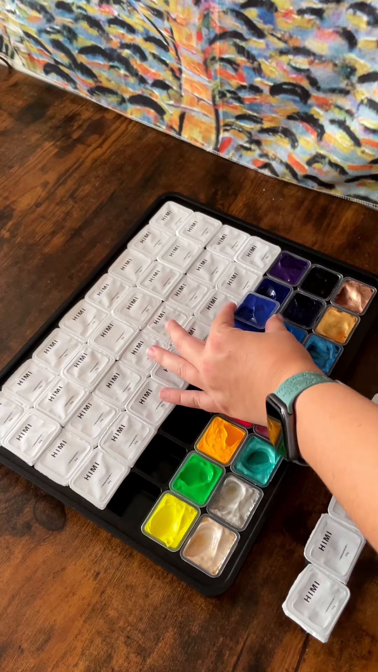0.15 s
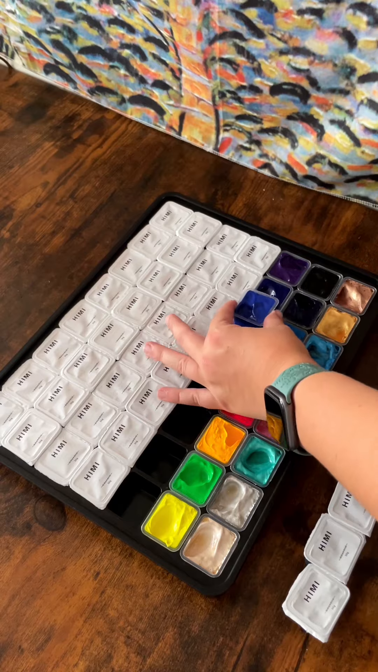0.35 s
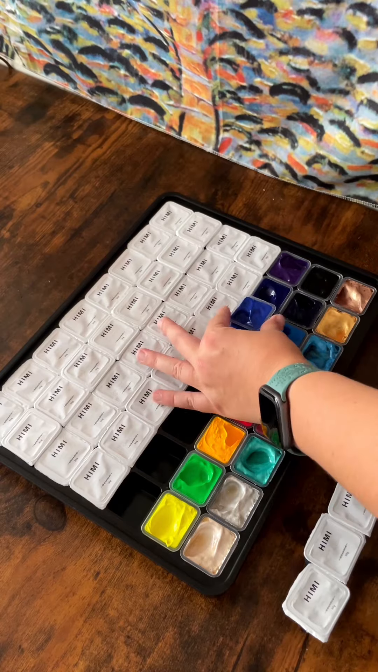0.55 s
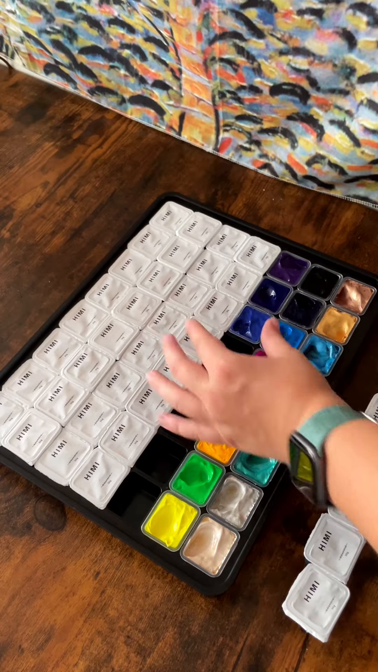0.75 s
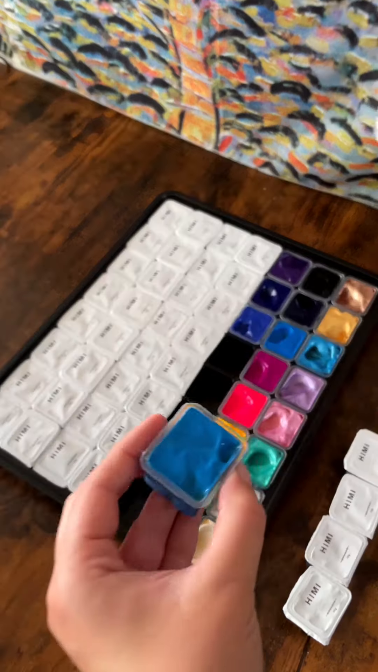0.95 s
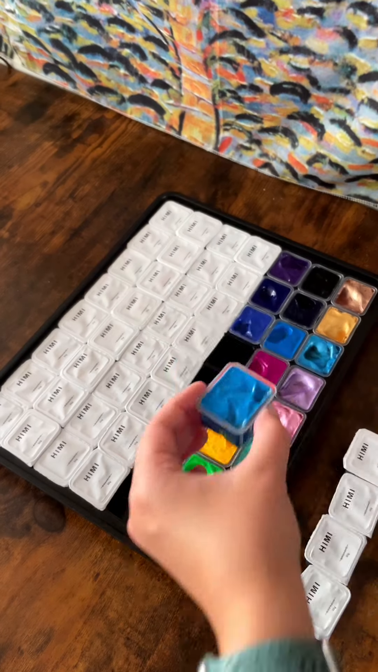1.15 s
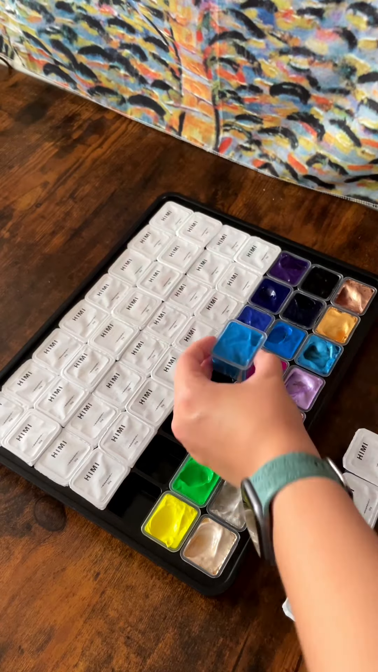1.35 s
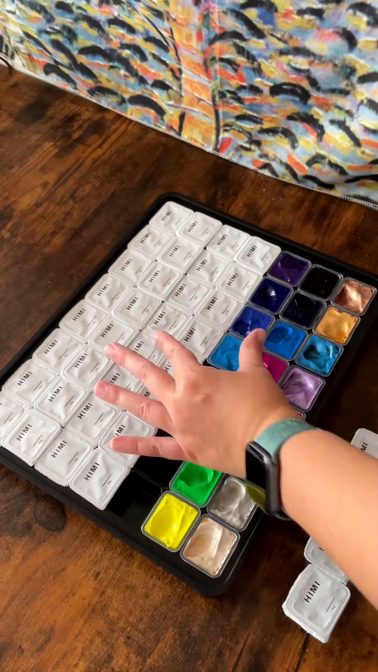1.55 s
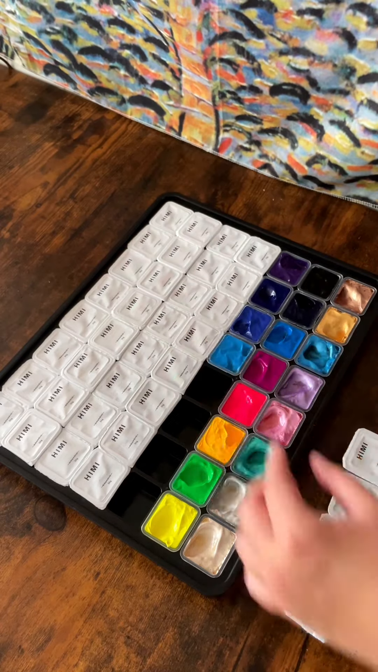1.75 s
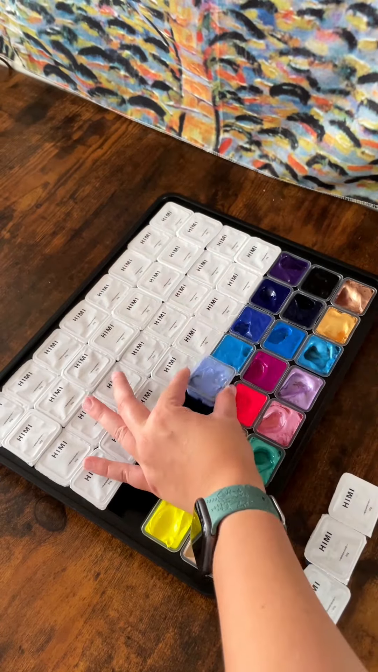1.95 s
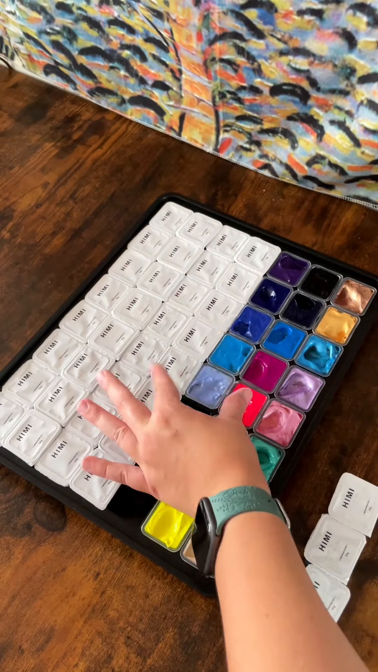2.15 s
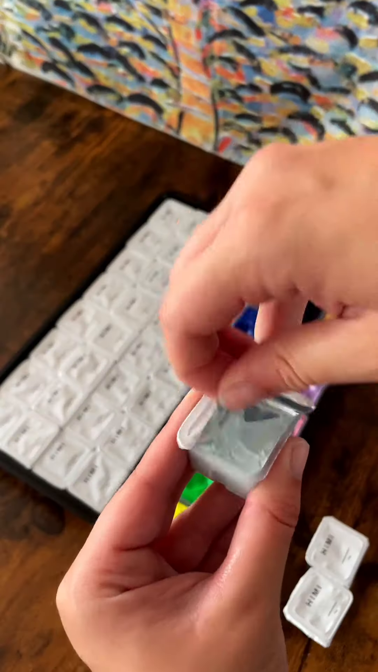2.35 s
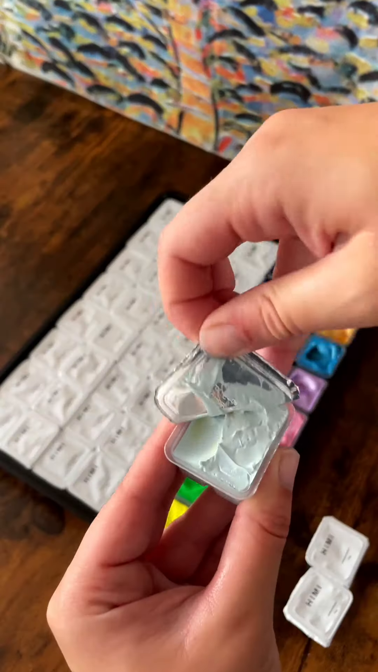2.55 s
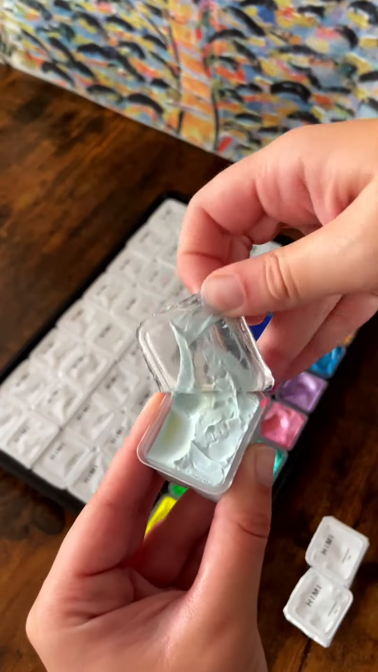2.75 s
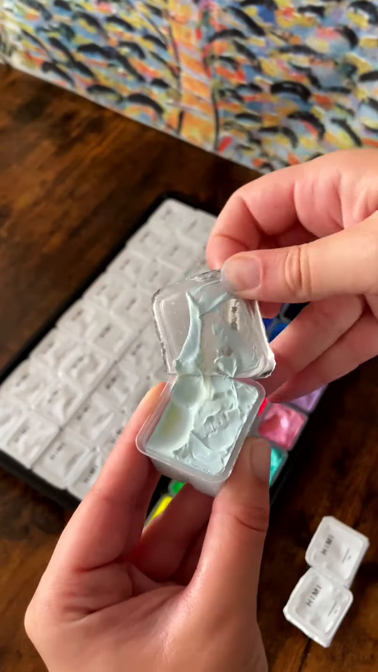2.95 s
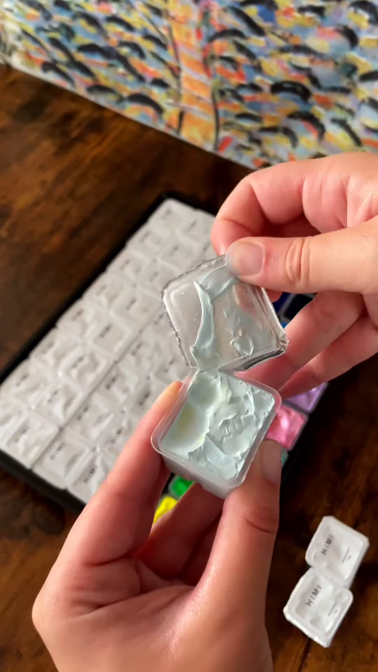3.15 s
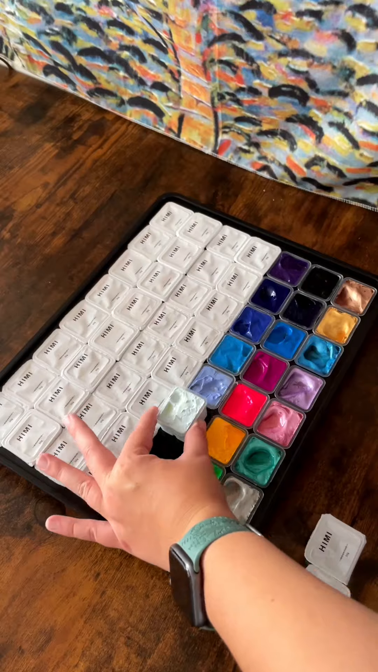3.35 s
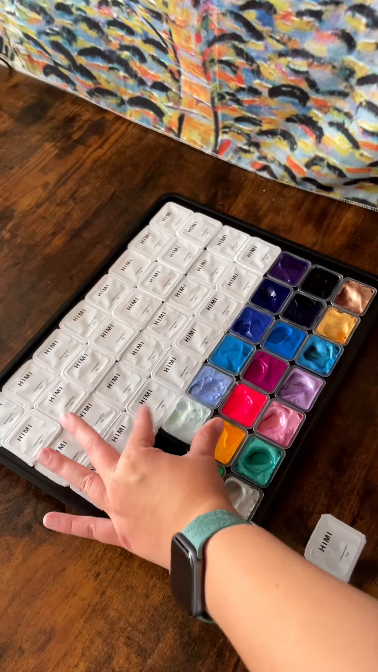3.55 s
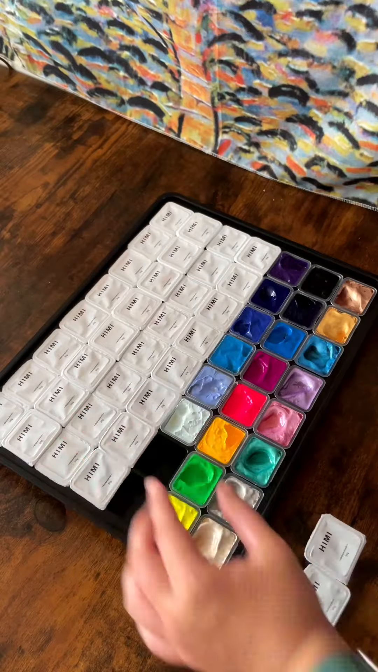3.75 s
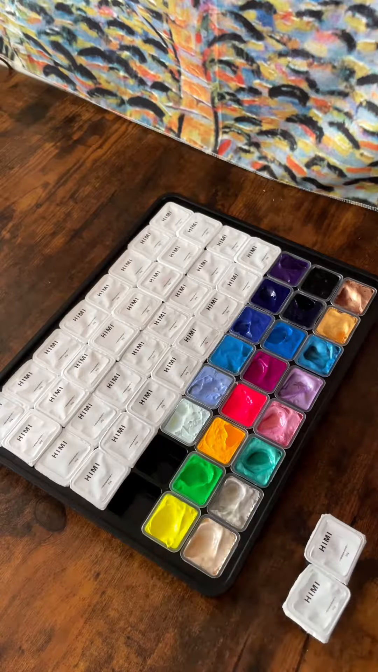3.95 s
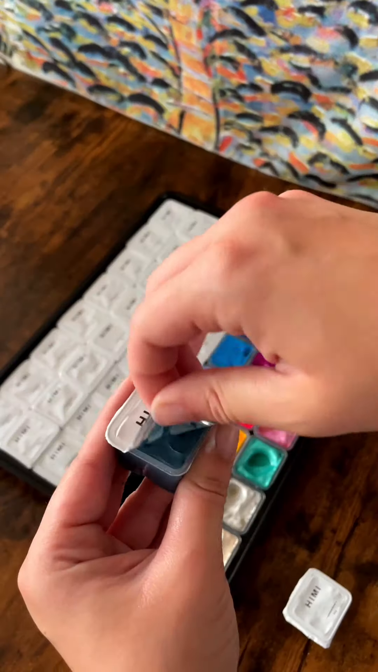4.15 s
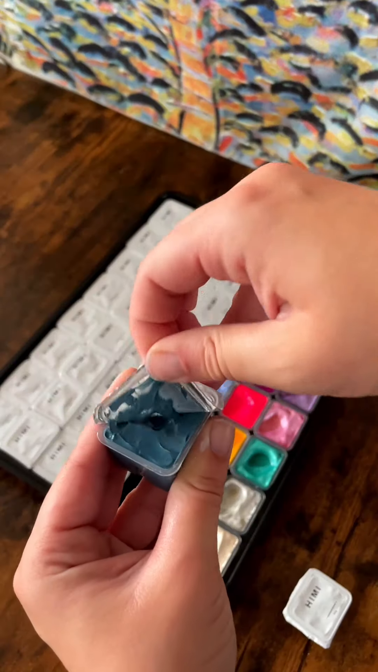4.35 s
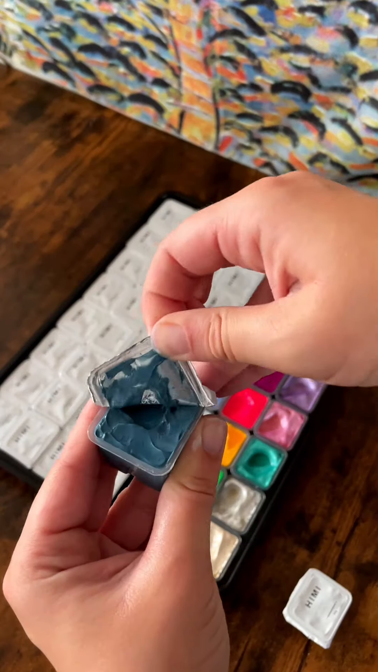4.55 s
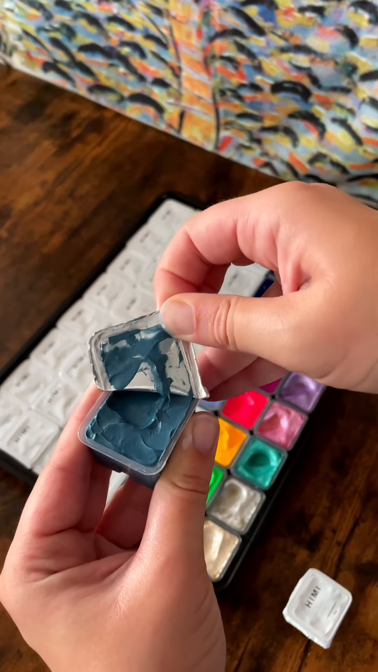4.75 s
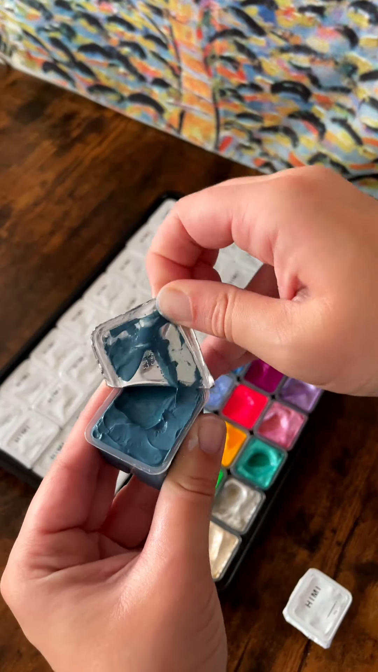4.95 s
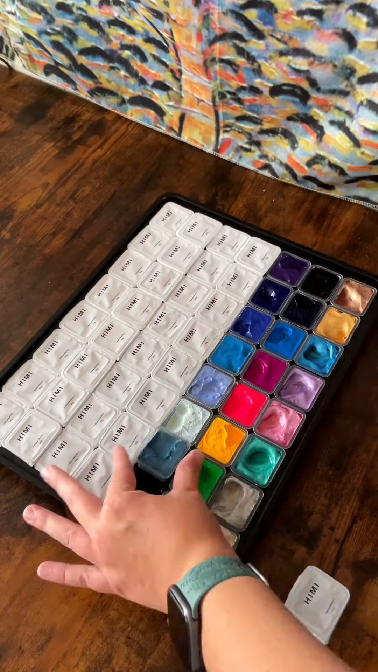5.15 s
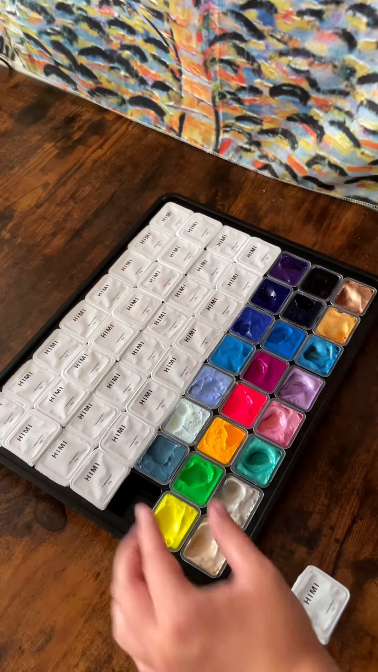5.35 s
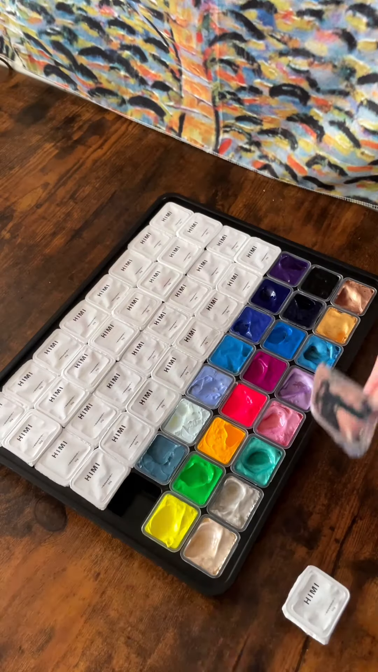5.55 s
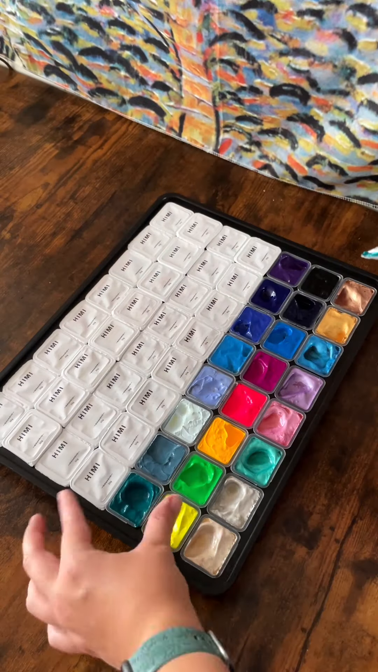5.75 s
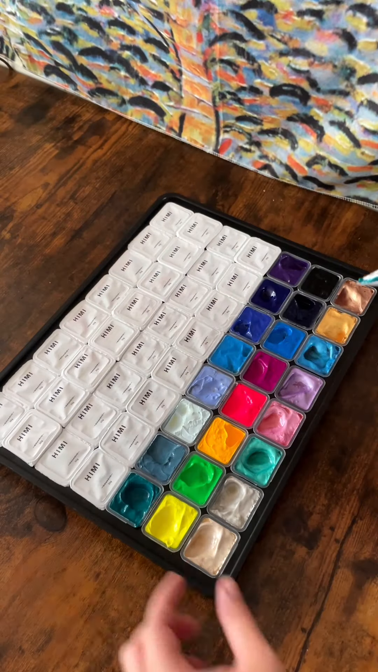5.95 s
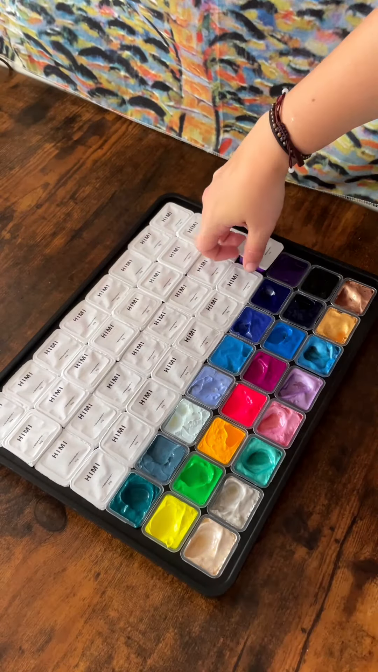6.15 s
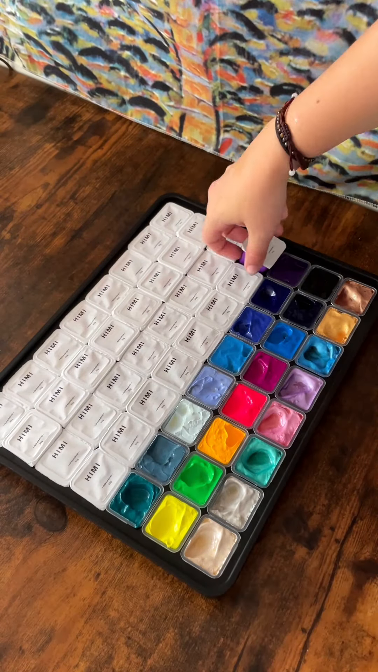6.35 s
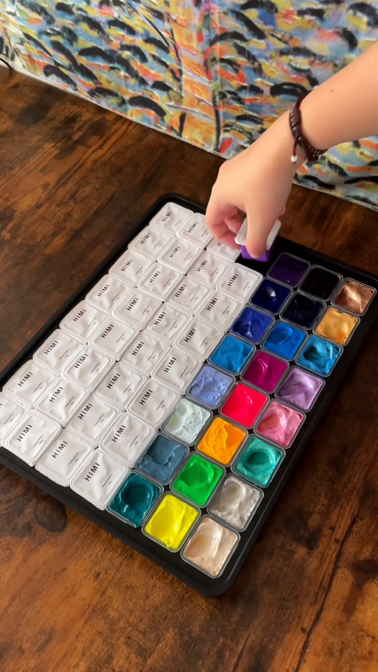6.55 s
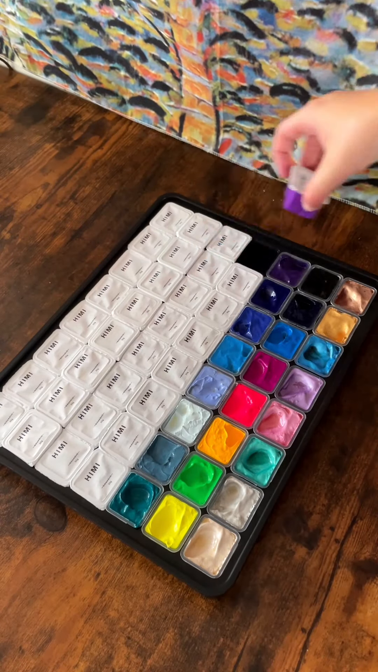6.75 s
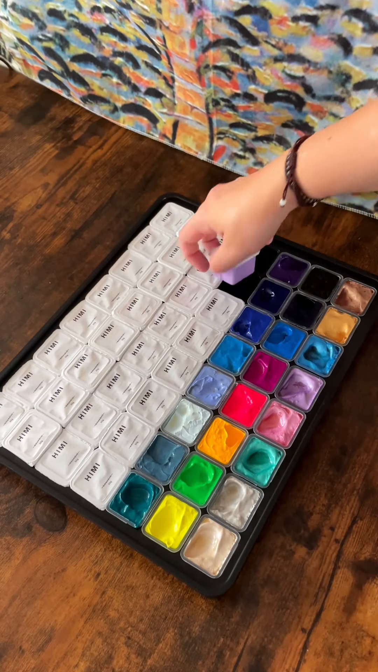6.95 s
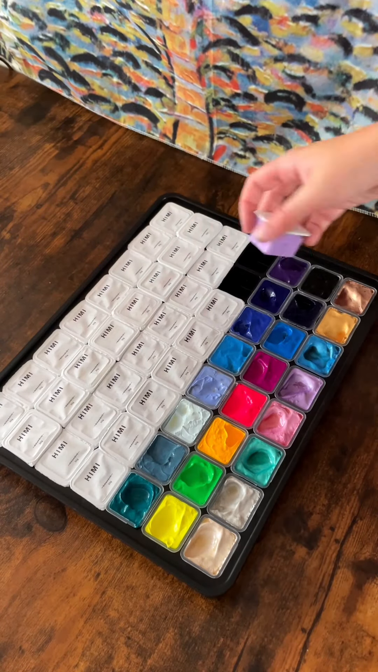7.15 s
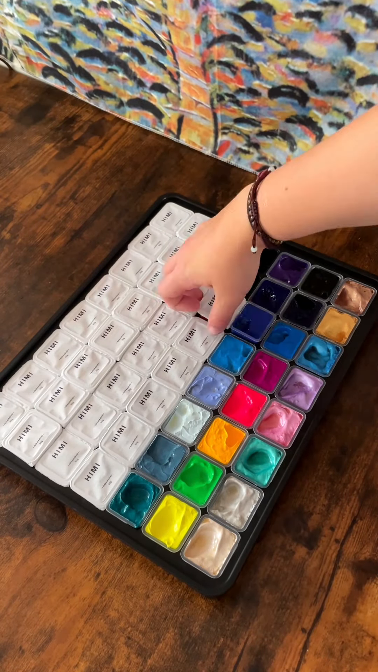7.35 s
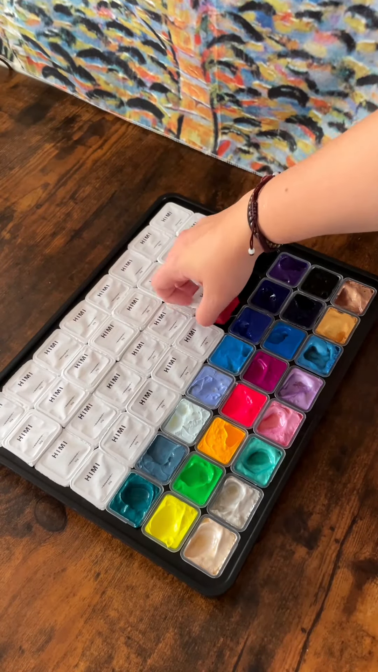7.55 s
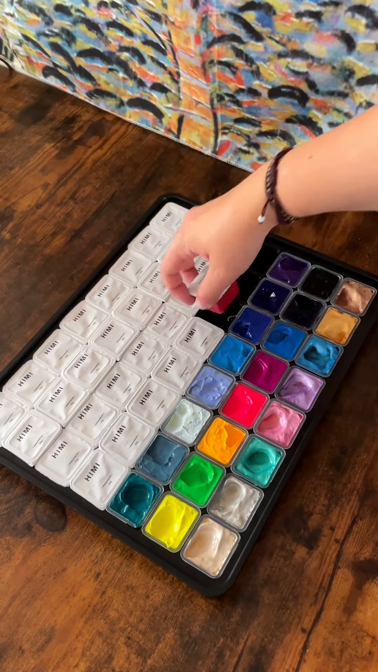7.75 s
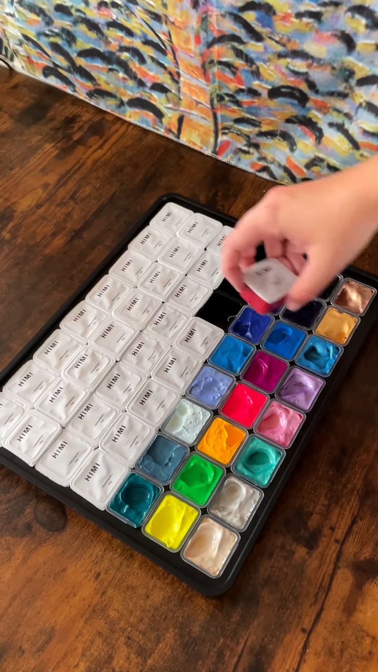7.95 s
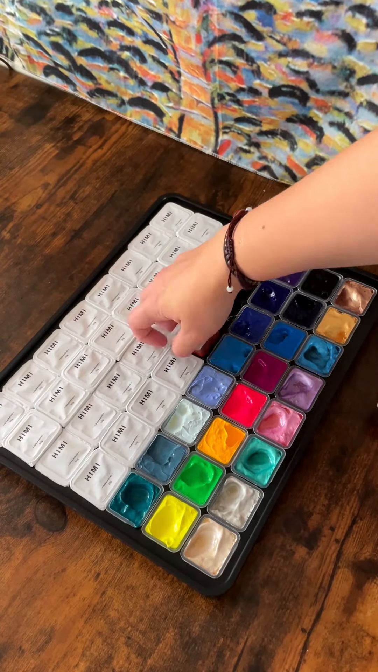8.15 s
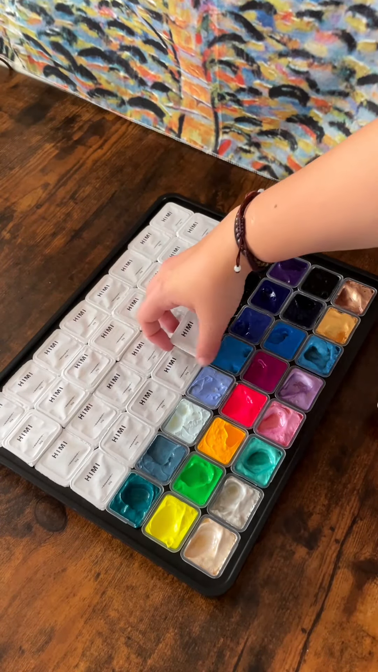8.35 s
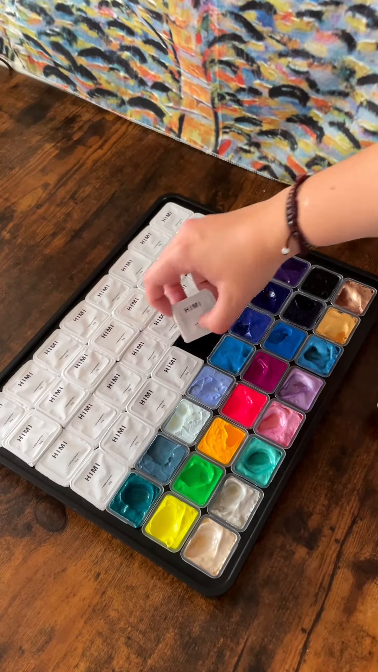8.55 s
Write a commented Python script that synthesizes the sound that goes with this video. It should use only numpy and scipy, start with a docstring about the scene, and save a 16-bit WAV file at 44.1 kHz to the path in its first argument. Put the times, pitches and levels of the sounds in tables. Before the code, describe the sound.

Close to a phone in a quiet indoor room, small plastic paint cups clack into a tray with soft wooden thumps. A sharp, bright film snap rings out around two and a half seconds, then more clacks. A slow sticky peel crackles in even tugs near the middle, followed by seating knocks, faint rubs and sparse cup clicks. Low rumble, hum and thin hiss lie underneath.

```python
"""Stiff plastic seals are peeled off small paint cups close to a phone, in a quiet room.
The film crackles in grains of parting glue and snaps in short noise bursts with a flap resonance.
Cups pushed into and lifted out of a plastic tray knock in ringing bursts and shake a wooden desk's modes.
Filtered grains make the rubs and brushes; damped sines make soft bumps through the stand.
Shaped noise gives the room's rumble and hiss, and steady sines its low hum."""
import sys
import numpy as np
from scipy import signal
from scipy.fft import rfft, irfft
from scipy.io import wavfile
from scipy.ndimage import uniform_filter1d

SR = 44100
rng = np.random.default_rng(int(sys.argv[2]) if len(sys.argv) > 2 else 0)


def unload_wav(signal):
    """Save mono or channel-first audio to the path in sys.argv[1] as 16-bit WAV at rate SR, clipped to [-1, 1]."""
    wavfile.write(
        sys.argv[1],
        SR,
        np.round(np.clip(np.atleast_2d(signal).T, -1, 1) * 32767).astype(np.int16),
    )


N = 378819

# Film snaps, and one dry, low cup knock at 3.24 s. Each row: time in seconds, strength in dB (broad
# colour at 2.3 kHz), resonance in Hz (the flap's, for a snap), body in dB, treble slope in dB per octave,
# extra room send in dB.
FILM_SNAPS = [(0.0123, -37.5, 1410, -3, 6, 0), (0.297, -17, 6040, 6, 0.5, 15),
              (2.3586, 1, 1650, -9.5, -1, 6), (2.3702, -11, 2300, -10, -4, -4),
              (2.3724, 14.5, 2700, -16.5, -3.5, -2.5), (2.6383, 2, 895, -1.5, -8.5, -1),
              (2.685, -13, 2110, -6, -0.5, -2), (2.7381, -11, 4970, 3, 0.5, -5.5),
              (2.8004, -2.5, 2100, 4.5, 2, -2.5), (2.9949, -16, 5320, 2, -1.5, -4),
              (3.0022, -4, 5100, 5.5, 0, -0.5), (3.1794, -16.5, 2020, 4, -2, 3),
              (3.221, -25.5, 1400, 3, -0.5, -0.5), (3.2364, 6.5, 2940, -4, -1, -38),
              (3.24, -0.5, 438, 5, -2, -29), (4.27, -20, 1120, 6, -3.5, 10),
              (4.311, -8.5, 1030, -0.5, -11, 1), (4.3476, -2, 3360, -2.5, -5, 3),
              (4.3697, -15.5, 2370, -5, -4.5, -7), (4.4826, -31, 5020, -13, 0, -4),
              (4.567, -30.5, 4880, 0, -1, -6), (4.5899, -10, 4760, 10.5, -0.5, 2),
              (4.7776, -34, 5270, 8, -4, 9), (4.9014, 0, 3520, -10.5, 0.1, -2),
              (4.982, -26.5, 3150, 5, 3, 7), (5.0083, -28, 3640, 6, 2.5, 9),
              (5.086, -23.5, 1450, -6, 1, 12), (5.0998, -16, 3545, -6, 1.4, -25),
              (5.1163, -21, 5360, -9, 2, -25), (5.1202, -10.5, 3460, 0.5, 4.5, -49),
              (7.5024, -28, 5210, 9.5, 7, -4)]
# A hollow and an overtone above that resonance. Each row: multiple of it, height in dB.
FLAP_PARTIALS = [(1.5, -3), (2.85, 1)]
# A cup knocks on the tray or its neighbours. Each row: time in seconds, strength in dB (broad colour
# at 1.15 kHz), cup resonance in Hz, hardness of the contact in dB.
CUP_KNOCKS = [(0.0168, -10.5, 1510, -3), (0.227, -16, 433, -18), (0.3124, -14.5, 870, 0),
              (0.4574, -11, 465, 2.5), (0.584, -10, 2300, 0), (0.6153, -5.5, 534, -0.5),
              (0.6318, -4.5, 407, 2), (1.4838, -10, 580, 3.5), (1.516, -4, 730, 2.5), (1.5303, 6, 870, -1),
              (1.9283, -23, 605, -15), (2.023, -19.5, 1180, -4), (2.0774, -16.5, 794, -1),
              (2.1685, -2, 826, 7.5), (2.1712, -4, 800, -6), (2.4031, -12, 2750, 10),
              (2.9443, -3.5, 800, -5), (3.353, -11, 573, -13), (3.4806, -18, 620, -12),
              (3.548, -6.5, 560, 0), (3.5775, -10.5, 590, -6.5), (3.5999, -4.5, 524.5, 2.5),
              (5.058, -8, 453, -13), (5.166, -8.5, 630, -2), (5.1901, -6.5, 625, 2.5), (5.2088, -7, 930, 5),
              (5.726, -1.5, 610, -3.5), (5.7452, -2, 476, -2), (6.2616, -19, 1128, -18.5),
              (6.307, -22, 1175, -5.5), (6.878, -14.5, 865, -12), (6.9213, -18.5, 905, 11),
              (6.931, -6.5, 890, 3.5), (6.9359, -3.5, 801, -6), (7.5624, 2.5, 455, -2),
              (8.285, -8, 1930, 8.5), (8.33, -15, 673, 1), (8.4205, -9, 1200, 1.5)]
# A cup is wiggled along its slot until it stops and shakes the desk. Each row: first touch in seconds,
# stop in seconds, jostle strength in dB, desk thump in dB before the desk's trim.
SEATINGS = [(0.549, .634, -20.5, -42), (1.467, 1.534, -26, -39), (2.15, 2.175, -27, -41),
            (3.348, 3.35, -25, -45), (3.53, 3.6, -18.5, -41.5), (5.182, 5.211, -15.5, -40.5),
            (5.728, 5.748, -8, -40.5), (6.855, 6.945, -25.5, -42), (7.53, 7.565, -21, -43)]
# Fingers, film and cup walls slide on each other. Each row: start in seconds, end in seconds,
# level in dB before the rubbing trim, brightness in dB.
RUBS = [(0.046, 0.101, -76.5, -0.5), (1.289, 1.476, -67.5, -10), (2.884, 2.904, -58.5, -16),
        (3.574, 3.599, -53.5, -7.5), (3.81, 3.91, -66.5, -5), (4.09, 4.105, -60.5, -7),
        (4.449, 4.459, -55.5, -1), (5.408, 5.53, -69.5, -11), (5.92, 5.994, -68.5, -4.5),
        (6.167, 6.226, -73, 2), (6.794, 6.813, -79, 15.5), (6.856, 6.933, -71, -5),
        (7.093, 7.113, -61.5, -4), (7.172, 7.189, -68, 8), (7.479, 7.573, -63, -4),
        (7.782, 7.808, -71.5, 5), (8.034, 8.089, -78, 18), (8.18, 8.265, -64.5, -3),
        (8.533, 8.579, -80, 4.5)]
# Modes of the desk under the tray. Each row: frequency in Hz, relative level in dB, t60 in seconds.
DESK_MODES = [(64, 0.5, .25), (101, 0.5, 0.15), (136.7, 1.5, .26), (185, -4.5, 0.2), (231.5, 0, 0.1),
              (348, -11, 0.23), (431, -5.5, 0.11)]
# Soft bumps reach the microphone through its stand. Each row: time in seconds, level in dB, pitch in Hz.
STAND_BUMPS = [(1.273, -33, 101.8), (1.287, -29, 84.6), (1.331, -37.5, 73.6)]
# A finger pad or cup edge brushes the tray. Each row: start in seconds, end in seconds,
# level in dB, centre of the resonance in Hz.
BRUSHES = [(3.796, 4.027, -73, 1900), (4.091, 4.099, -57.5, 3540), (4.453, 4.457, -47, 3540),
           (5.881, 6.055, -78, 2660), (6.205, 6.238, -69.5, 1150), (6.488, 6.524, -72, 1412),
           (7.38, 7.427, -77.5, 1820), (7.496, 7.517, -58.5, 5760), (7.957, 8.128, -81.5, 1776)]
# Colour of the room rumble. Each row: frequency in Hz, relative density in dB per Hz.
RUMBLE_COLOUR = [(15, -28), (28, -15.5), (40, 0.5), (60, -1), (82, -7), (120, -2.5), (180, -11.5),
                 (300, -13), (480, -14), (620, -22), (850, -23.5), (1300, -34), (3000, -54.5),
                 (16000, -94.5)]
# Colour of the hiss. Each row: frequency in Hz, relative density in dB per Hz.
HISS_COLOUR = [(200, -20), (800, 1.5), (2200, 5), (3500, -1), (5800, -2), (8000, -18.5), (11000, -6.5),
               (13000, -19.5), (16000, -39.5)]
# The hiss swells now and then; at 2.62 s it is the snap's long room tail.
# Each row: peak in seconds, half width in seconds, level in dB.
HISS_SWELLS = [(.58, 0.48, -79.5), (1.5, 0.68, -74.5), (2.62, 0.15, -66.5), (3.45, 0.26, -83),
               (4.85, 0.5, -79), (5.65, 0.38, -73.5), (8.4, 0.18, -79)]
# Lines of the electric hum. Each row: frequency in Hz, level in dB rms.
HUM_LINES = [(59.8, -62.5), (119.6, -74), (474, -73)]
# Likeness of the two ports in diffuse sound. Each row: frequency in Hz, left-right coherence.
PORT_LIKENESS = [(60, 0.97), (130, 1), (290, .6), (640, -0.1), (1400, 0.052), (3100, 0.51), (6800, -0.11),
                 (15000, 0.58)]
# Phase of near sound at the ports. Each row: frequency in Hz, lead of the left port in radians.
PORT_PHASE = [(0, 0), (350, 0), (700, 1.18), (1400, -1), (2600, 1), (3900, 1.49), (4900, 1.2), (6500, 2.11),
              (7700, 3.5), (10900, 7), (16000, 10.5)]
# Balance of near sound at the ports. Each row: frequency in Hz, left minus right in dB.
PORT_BALANCE = [(100, -1.5), (200, -3), (330, -4), (550, -8), (1150, 0), (1700, -1), (2600, -1.5),
                (4000, -1.5), (4450, -3), (5200, -0.5), (16000, 0)]
# Decay of the room's reflections. Each row: frequency in Hz, t60 in seconds.
ROOM_T60 = [(150, 0.2), (500, 0.4), (1500, 0.37), (3000, 0.46), (6000, 0.23), (11000, 0.2), (16000, .22)]
# Colour of the room's reflections. Each row: frequency in Hz, relative level in dB.
ROOM_COLOUR = [(100, 6), (1000, 2.5), (2700, -3), (6000, 2.5), (8000, -11), (10500, -2), (13000, -4.5),
               (14500, -13), (16500, -16.5)]

EDGE_HZ = 16600  # the recorder's upper band limit
TAPS = 4096  # length of a burst in samples
BINS = np.fft.rfftfreq(TAPS, 1 / SR)  # Hz
ALL_BINS = np.fft.rfftfreq(N, 1 / SR)  # Hz
TIME = np.arange(N) / SR  # s
FLAP_PEAK_DB, FILM_EDGE_DB = 8, 1.5  # weight of the flap's resonance; extra bite of the film near 5 kHz
CUP_HZ, CUP_BODY_DB, BODY_DB_PER_OCTAVE = 650, 3, -1.5  # a cup that rings lower also has more body
# hardness lifts the fizz fully, the edge by a share
CUP_EDGE_DB, CUP_FIZZ_DB, EDGE_SHARE, CUP_SEND_DB = -12.5, -22, 0.94, -7
# small contacts on the way along the slot
JOSTLE_GAP_S, JOSTLE_SPREAD_DB, JOSTLE_OCTAVES, JOSTLE_HARD_DB = 0.015, 4, .4, 2
# the slow peel advances in even tugs, the glue quieter between them
FIRST_TUG_S, PEEL_END_S, TUGS_PER_S = 4.105, 5.2, 5.92
TUG_DB, TUG_DB_PER_S, SLACK_DB = -63.5, 1, -12
# rumble and the hiss under its swells are steady, and drop once around QUIET_S: (dB before, dB after)
QUIET_S, DROP_S, RUMBLE_DB, HISS_DB = 6.08, 0.2, (-55.5, -60), (-81.5, -84)


def gain_of(db):
    """Decibels to amplitude."""
    return 10 ** (np.asarray(db) / 20)


def evened(x):
    """Scales to rms 1."""
    return x / np.sqrt(np.mean(x ** 2) + 1e-20)


def read(points, hz):
    """Joins (Hz, value) points on a log-frequency axis."""
    f, value = np.transpose(points)
    return np.interp(np.log(hz + 1), np.log(f + 1), value)


def add(mix, s, sound):
    """Mixes a sound in at time s."""
    part = mix[..., max(round(s * SR), 0):][..., :sound.shape[-1]]
    part += sound[..., :part.shape[-1]]


def shaped(x, spectrum):
    """Gives a long signal a (Hz, dB) spectrum, at rms 1."""
    gain = gain_of(read(spectrum, ALL_BINS))
    return evened(irfft(rfft(x) * gain, N))


def diffuse(pair, right_db=1.0):
    """Two unrelated signals gain the coherence of two close ports, most alike in the bass."""
    size = pair.shape[-1]
    left, other = rfft(pair)
    same = np.clip(read(PORT_LIKENESS, np.fft.rfftfreq(size, 1 / SR)), -1, 1)
    right = gain_of(right_db) * (same * left + np.sqrt(1 - same ** 2) * other)
    return irfft(np.array([left, right]), size)


def coloured(burst, colour_db):
    """Causal filter that gives a burst the broad colour asked for and keeps its fine ripple."""
    z = rfft(burst, TAPS)
    k = np.arange(len(z))
    lo = np.maximum(k - k // 4 - 10, 0)
    hi = np.minimum(k + k // 4 + 10, len(z) - 1)
    total = np.cumsum(abs(z) ** 2)
    broad_power = (total[hi] - total[lo]) / (hi - lo)
    log_gain = np.log(gain_of(colour_db)) - np.log(broad_power + 1e-12) / 2
    # minimum phase: the phase follows from the log gain, mirrored to a full circle
    causal = np.conj(signal.hilbert(np.r_[log_gain, log_gain[-2:0:-1]]))[:len(z)]
    return irfft(z * np.exp(causal), TAPS)


def bump(hz, width):
    """Bell of height 1 around a resonance; the width is a share of its frequency."""
    return 1 / (1 + ((BINS - hz) / (width * hz)) ** 2)


def dying(t60):
    """Dense noise ringing of unit energy that falls 60 dB per t60 seconds."""
    ring = rng.standard_normal(TAPS) * gain_of(-60 * np.arange(TAPS) / SR / t60)
    return ring / np.linalg.norm(ring)


def grainy_rise(size, rise_db):
    """Noise of unit energy that grows by rise_db over a few milliseconds."""
    grit = rng.standard_normal(size) * gain_of(rise_db * np.arange(size) / size)
    return grit / np.linalg.norm(grit)


def grains(per_s, spread_db):
    """Random tiny slips, a few much larger than the rest."""
    size = gain_of(spread_db * np.minimum(rng.exponential(1, N), 4))
    return size * rng.choice([-1., 1.], N) * (rng.random(N) < per_s / SR)


def stroke(start, end):
    """Speed of a slide that gathers and stops, 0-1."""
    progress = np.clip((TIME - start) / max(end - start, 1e-3), 0, 1)
    return np.sqrt(np.maximum(np.sin(np.pi * progress), 0))


def bounced(x, delay_s, echo_db):
    """The desk top throws a sound straight back, a little duller."""
    echo = gain_of(echo_db) * np.exp(-2j * np.pi * ALL_BINS * delay_s) / (1 + ALL_BINS / 9000)
    return irfft(rfft(x) * (1 + echo), N)


def ports(x):
    """Near sound leads at the left port over most bands, and the phone's body shades each port differently."""
    phase = np.interp(ALL_BINS, *np.transpose(PORT_PHASE))
    half = np.exp(.5j * phase) * gain_of(read(PORT_BALANCE, ALL_BINS) / 2)
    return irfft(rfft(x) * np.array([half, 1 / half]), N)


def room(x, early_db, early_s):
    """Dense reflections, strongest from the desk and wall nearby, each band dying at its own speed."""
    hz, t, z = signal.stft(diffuse(rng.standard_normal((2, SR))), SR, nperseg=256)
    fade_db = read(ROOM_COLOUR, hz)[:, None] - 60 * t / read(ROOM_T60, hz)[:, None]
    tail = signal.istft(z * gain_of(fade_db), SR, nperseg=256)[1]
    t = np.arange(tail.shape[1]) / SR
    onset = np.clip((t - .003) / 0.0015, 0, 1)
    early = 1 + gain_of(early_db) * np.exp(-t / early_s)
    tail = tail * onset * early
    return signal.fftconvolve(x[None], tail / np.linalg.norm(tail[0]), axes=1)[:, :N]


def patchy(x, patchy_db, bins=12, frames=30):
    """Lets the colour of a steady noise wander in patches a few hundred hertz wide."""
    z = signal.stft(x, nperseg=1024)[2]
    patches = uniform_filter1d(rng.standard_normal(z.shape[1:]), size=bins, axis=0)
    patches = uniform_filter1d(patches, size=frames, axis=1)
    return evened(signal.istft(z * gain_of(patchy_db * evened(patches)), nperseg=1024)[1][:, :N])


def background():
    """Low room rumble and faint hiss from shaped diffuse noise, with an electric hum of steady sines."""
    step = [QUIET_S - DROP_S / 2, QUIET_S + DROP_S / 2]
    rumble = shaped(diffuse(rng.standard_normal((2, N))), RUMBLE_COLOUR)
    rumble *= gain_of(np.interp(TIME, step, RUMBLE_DB))
    # the swells add to the hiss as power
    swells = sum(gain_of(db) ** 2 * np.exp(-((TIME - s) / width) ** 2) for s, width, db in HISS_SWELLS)
    hiss_level = np.sqrt(gain_of(np.interp(TIME, step, HISS_DB)) ** 2 + swells)
    hiss = shaped(diffuse(rng.standard_normal((2, N))), HISS_COLOUR)
    hiss = patchy(hiss, patchy_db=0.3) * hiss_level
    hum = np.zeros(N)
    for hz, db in HUM_LINES:
        hum += np.sqrt(2) * gain_of(db) * np.sin(2 * np.pi * (hz * TIME + rng.random()))
    return rumble + hiss + hum


def film_snaps(crack_t60=0.0026, flap_t60=.024, flap_db=-14, lead_db=-26, room_db=-18):
    """A faint grainy rise of a few milliseconds leads into the crack, then the loose flap rings briefly."""
    near, send = np.zeros((2, N))
    lead = round(.004 * SR)
    for s, db, hz, body, slope, wet in FILM_SNAPS:
        edge = FILM_EDGE_DB + slope * np.log2(5300 / 2300)
        fizz = slope * np.log2(10500 / 2300)
        colour = read([(60, body - 32), (420, body - 7), (900, body - 1), (2300, 0.00024),
                       (5300, edge), (10500, fizz), (13000, fizz - 3), (16000, fizz - 14)], BINS)
        colour += db + FLAP_PEAK_DB * (bump(hz, width=0.12) - .55)
        for multiple, part_db in FLAP_PARTIALS:
            colour += part_db * bump(hz * multiple, width=0.057)
        rise = gain_of(lead_db) * grainy_rise(lead, rise_db=14)
        crack = dying(crack_t60) + gain_of(flap_db) * dying(flap_t60)
        snap = coloured(np.r_[rise, crack], colour)
        add(near, s - lead / SR, snap)
        add(send, s - lead / SR, snap * gain_of(wet))
    direct = ports(bounced(near, delay_s=0.0021, echo_db=-10.5))
    return direct + gain_of(room_db) * room(send, early_db=4, early_s=0.011)


def jostles():
    """Light, uneven contacts of each cup on its way along the slot, as rows like those of CUP_KNOCKS."""
    rows = []
    for start, stop, db, _ in SEATINGS:
        for s in np.arange(start, stop, JOSTLE_GAP_S):
            late, loud, pitch = rng.standard_normal(3)
            touch_s = s + late * JOSTLE_GAP_S / 5
            hz = CUP_HZ * 2 ** (JOSTLE_OCTAVES * pitch)
            rows.append((touch_s, db + JOSTLE_SPREAD_DB * loud, hz, JOSTLE_HARD_DB))
    return rows


def cup_knocks(blow_t60=0.0083, shell_t60=0.032, shell_db=-7, peak_db=6, scrape_db=-13,
               room_db=-6, rattle_db=-12):
    """A cup scrapes for a moment along its slot, then strikes and sets its neighbours rattling."""
    near, send = np.zeros((2, N))
    lead = round(.006 * SR)
    for s, db, hz, hard in CUP_KNOCKS + jostles():
        body = CUP_BODY_DB + BODY_DB_PER_OCTAVE * np.log2(hz / CUP_HZ)
        edge, fizz = CUP_EDGE_DB + EDGE_SHARE * hard, CUP_FIZZ_DB + hard
        colour = read([(50, body - 16), (200, body - 5), (450, body), (1150, 0.0038), (2000, edge / 2),
                       (3000, edge), (6000, (edge + fizz) / 2 - 1), (8000, fizz - 1),
                       (12000, fizz - 2), (16000, fizz - 14)], BINS)
        colour += db + peak_db * (bump(hz, width=0.075) - .3)
        scrape = gain_of(scrape_db) * grainy_rise(lead, rise_db=15)
        blow = dying(blow_t60) + gain_of(shell_db) * dying(shell_t60)
        knock = coloured(np.r_[scrape, blow], colour)
        add(near, s - lead / SR, knock)
        add(send, s - lead / SR, knock * gain_of(CUP_SEND_DB))
        # loose cups chatter in sparse, quickly fading ticks, heard only by way of the room
        chatter = dying(t60=0.15) * (rng.random(TAPS) < 500 / SR)
        rattle_colour = read([(200, -25), (900, -5.5), (1500, 2.0), (2300, 0.0), (3300, -11.5),
                              (7000, -18.5), (16000, -39)], BINS)
        rattle = coloured(chatter, db + rattle_db + rattle_colour)
        add(send, s, rattle * gain_of(CUP_SEND_DB))
    direct = ports(bounced(near, delay_s=.0026, echo_db=-14.0))
    return direct + gain_of(room_db) * room(send, early_db=3.5, early_s=.015)


def rubbing(level_db=-2, room_db=-6):
    """Fine stick-slip grains: dull from cup walls, bright from skin on film."""
    dull = shaped(grains(per_s=2000, spread_db=6),
                  [(200, -5), (700, -2), (2000, -2.0), (3500, -4.5), (5500, 1.0), (8000, -8.5), (16000, -20)])
    bright = shaped(grains(per_s=2200, spread_db=4),
                    [(1500, -45.0), (5000, -11.5), (7500, -8.5), (10500, 1.5), (13000, -4.0), (16000, -10.5)])
    out = np.zeros(N)
    for start, end, db, brightness in RUBS:
        friction = dull + gain_of(brightness) * bright
        out += gain_of(db + level_db) * stroke(start, end) * friction
    return ports(out) + gain_of(room_db) * room(out, early_db=8.5, early_s=0.016)


def desk(rise_s=0.0077, level_db=-1):
    """The desk top swells into its low modes each time a cup is seated."""
    out, t = np.zeros(N), np.arange(SR // 2) / SR
    for _, s, _, db in SEATINGS:
        ring = np.zeros(len(t))
        for hz, mode_db, t60 in DESK_MODES:
            ring += gain_of(mode_db - 60 * t / t60) * np.sin(2 * np.pi * (hz * t + rng.random()))
        add(out, s, gain_of(db + level_db) * ring * (1 - np.exp(-t / rise_s)))
    return ports(out)


def stand_bumps(swell_s=0.0087, overtone_db=-10):
    """Soft, heavily damped pushes of a few low cycles."""
    out, t = np.zeros(N), np.arange(SR // 4) / SR
    for s, db, hz in STAND_BUMPS:
        wobble = np.sin(2 * np.pi * hz * t) + gain_of(overtone_db) * np.sin(2 * np.pi * 2.06 * hz * t)
        add(out, s, gain_of(db) * wobble * t / swell_s * np.exp(1 - t / swell_s))
    return out


def brushing(width=0.22, room_db=-5):
    """Light friction sounds one broad resonance of the plastic that is touched."""
    grit, out = grains(per_s=1600, spread_db=4.5), np.zeros(N)
    for start, end, db, hz in BRUSHES:
        band = [hz / (1 + width), hz * (1 + width)]
        wall = signal.butter(2, band, "bandpass", fs=SR, output="sos")
        out += gain_of(db) * stroke(start, end) * evened(signal.sosfilt(wall, grit))
    return ports(out) + gain_of(room_db) * room(out, early_db=25, early_s=0.016)


def tugging():
    """Strength of the pull on the seal: it tightens and slackens at an even pace."""
    t = TIME - FIRST_TUG_S
    slack = np.sin(np.pi * TUGS_PER_S * t) ** 2
    return gain_of(TUG_DB + TUG_DB_PER_S * t + SLACK_DB * slack) * (t > -.02) * (TIME < PEEL_END_S)


def peeling(room_db=-10, fine_db=-12):
    """Threads of glue part in small clumps, each ticking the film."""
    clumps_db = 4 * evened(uniform_filter1d(rng.standard_normal(N), size=900))
    coarse = evened(grains(per_s=130, spread_db=6))
    fine = evened(grains(per_s=4000, spread_db=3))
    slips = (coarse + gain_of(fine_db) * fine) * gain_of(clumps_db)
    ticks = signal.oaconvolve(slips, dying(t60=0.0047))[:N]
    film = shaped(ticks, [(300, -35), (1200, -10.0), (3200, 0.0), (5300, 7.5), (7500, -3.0),
                          (11000, -2.5), (13500, -8.5), (16000, -10)])
    crackle = film * tugging()
    return ports(crackle) + gain_of(room_db) * room(crackle, early_db=5, early_s=.012)


def scene():
    """Hands at work over the desk, close to the phone, in the room."""
    hands = film_snaps() + cup_knocks() + rubbing() + brushing() + peeling()
    return background() + hands + desk() + stand_bumps()


def record(dry):
    """The recorder's band limit."""
    return signal.oaconvolve(dry, signal.firwin(511, EDGE_HZ, window=("kaiser", 9), fs=SR)[None], "same")


dry = scene()
out = record(dry)
unload_wav(out)
```